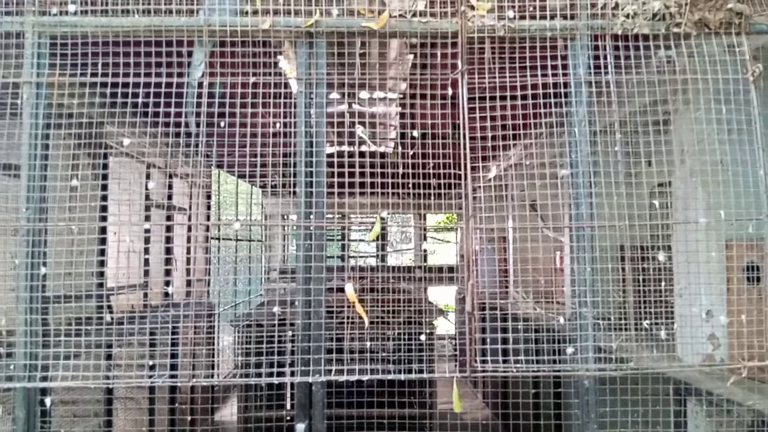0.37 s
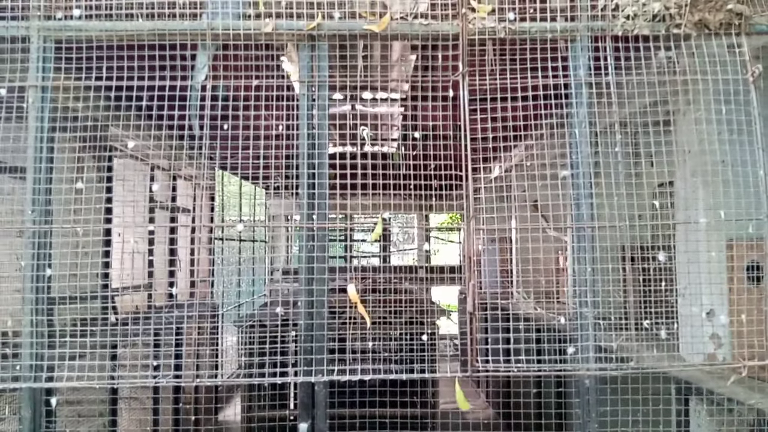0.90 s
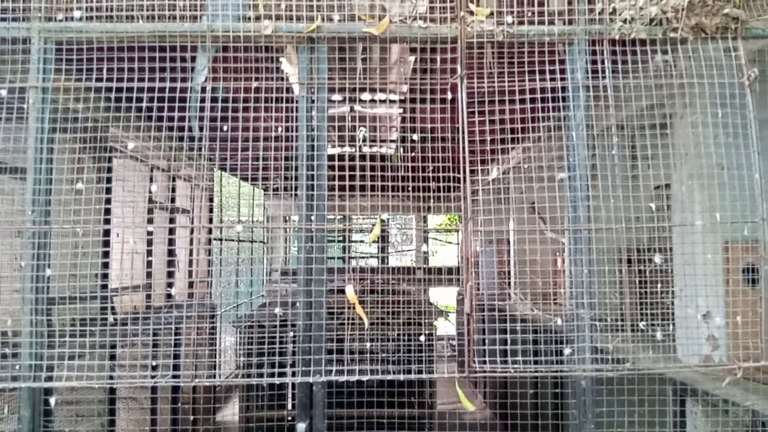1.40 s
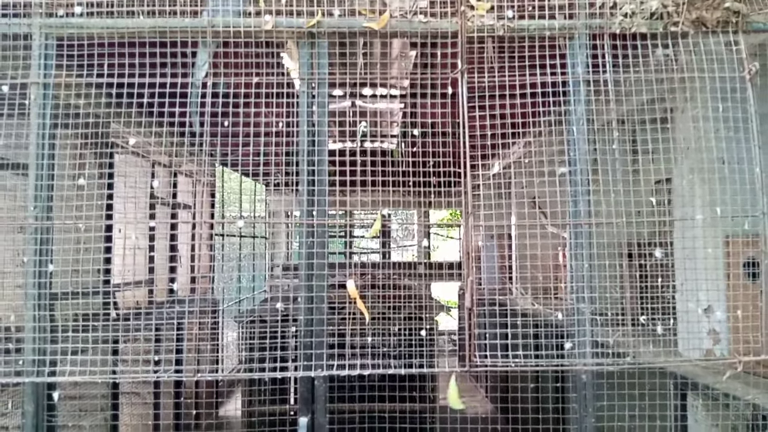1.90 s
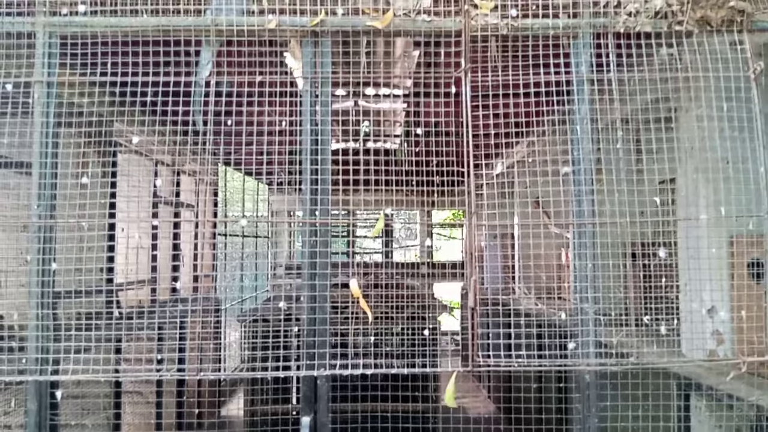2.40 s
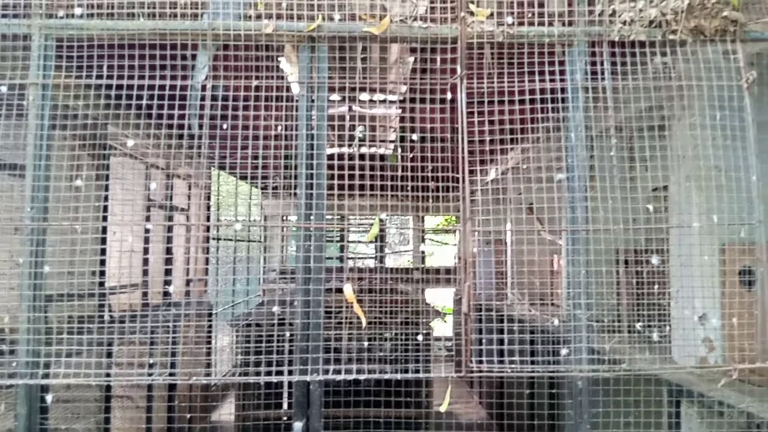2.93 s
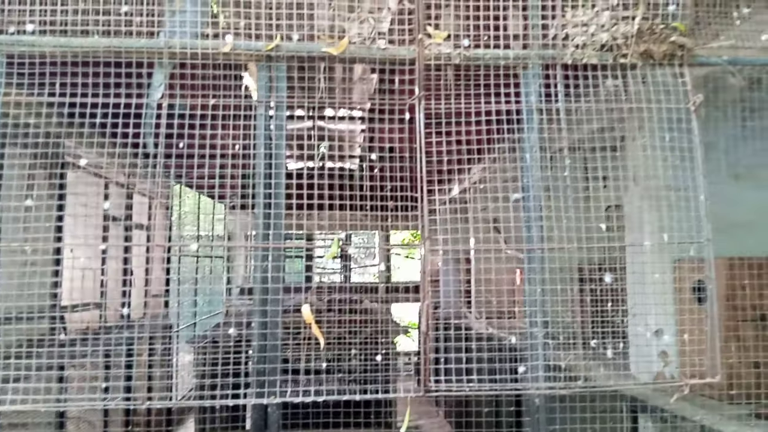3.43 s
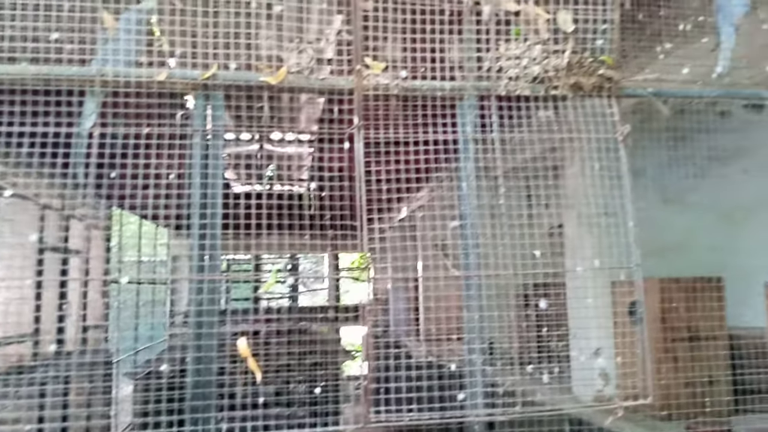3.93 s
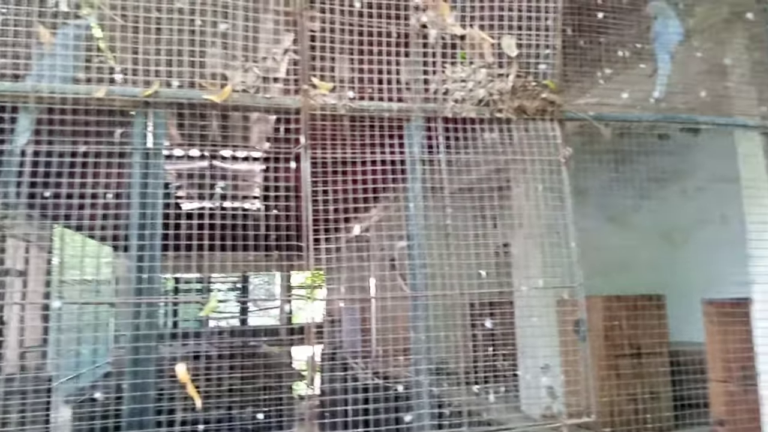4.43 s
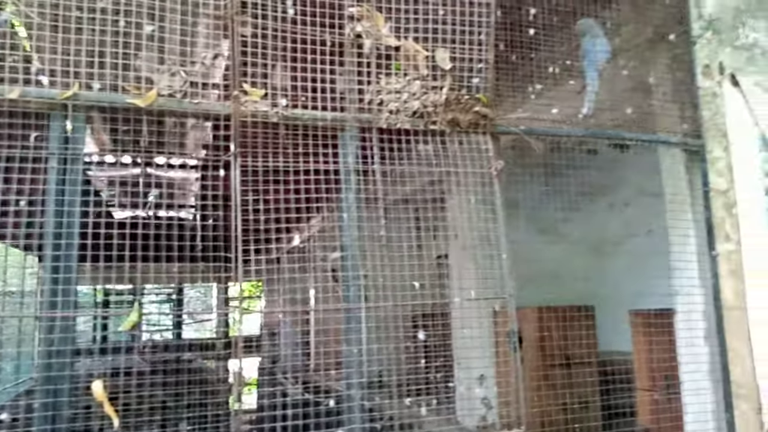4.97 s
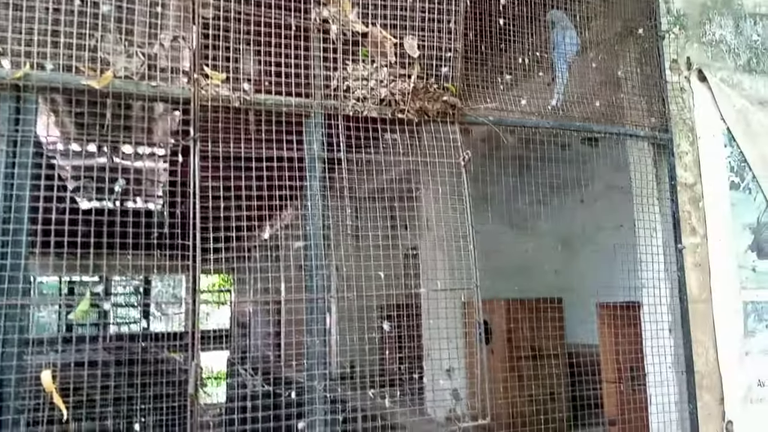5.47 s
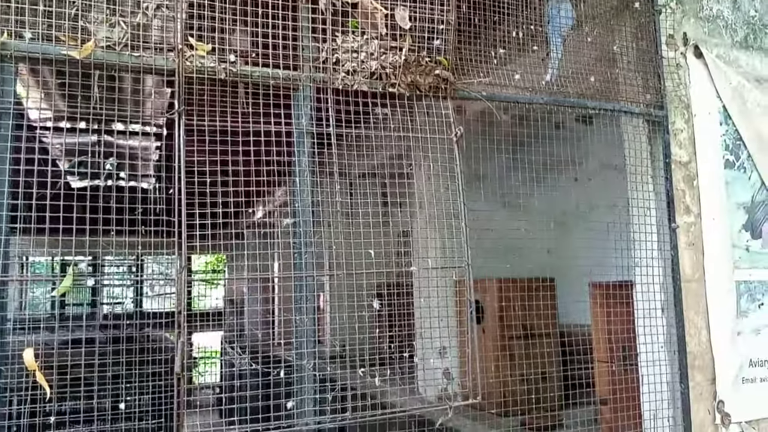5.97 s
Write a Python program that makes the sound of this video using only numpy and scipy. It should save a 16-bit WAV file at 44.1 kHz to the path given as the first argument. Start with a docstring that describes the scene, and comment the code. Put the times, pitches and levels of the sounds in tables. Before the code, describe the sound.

Shrill parakeet calls fill a small echoing aviary. First come four spaced warbles with a quick flutter and a lower fading tail, and one faint wooden knock. Then a nearer bird screeches in a fast regular series, joined by quick whistles and a winding call; a slight rustle passes near three seconds and the warbles resume. Quiet insect hiss and rumble duck beneath the loud calls.

```python
"""In a roofed wire aviary parakeets call: one repeats a warble, a nearer one answers with arched screeches,
others put in single whistles and long winding calls. Voices are harmonic series on a pitch curve, weighted by
throat, beak and microphone, with rasping breath. Walls and roof give a short echo, filtered noise makes the
hiss of insects outside, the rumble of air at the microphone and a rustle, and decaying partials make knocks
on wood. Gain control pulls the background down under loud calls."""
import sys
import numpy as np
from scipy import signal
from scipy.fft import rfft, irfft
from scipy.io import wavfile
from scipy.ndimage import uniform_filter1d

SR = 44100
rng = np.random.default_rng(int(sys.argv[2]) if len(sys.argv) > 2 else 0)


def natural_amplitude(level_db):
    """Convert a level in decibels to a linear amplitude factor, elementwise."""
    exponent = np.asarray(level_db, float) / 20
    return 10 ** exponent


def wav_out(sig):
    """Save sig, one row per channel (or a flat mono array), as 16-bit PCM at SR to the path in sys.argv[1]."""
    wavfile.write(sys.argv[1], SR, np.round(np.clip(np.atleast_2d(sig).T, -1, 1) * 32767).astype(np.int16))


N = 268921   # length [samples]

# warbles: (start [s], low note ends after [s], fade [s], high note [Hz], level [dB])
WARBLES = [(-0.005, 0.22, 0.17, 2126, 1), (0.526, .2, 0.19, 2131, 0.5), (1.069, .205, 0.18, 2111, 0),
           (1.637, 0.2, 0.15, 2097, -1.5), (3.038, 0.22, 0.29, 2106, -1.5), (3.586, 0.21, 0.21, 2116, -1),
           (4.151, .21, 0.16, 2088, -2.5), (4.727, 0.22, 0.19, 2067, -0.5), (5.3, 0.21, 0.22, 2039, -0.5)]
# screeches: (start [s], climb [s], crest [s], fall [s], top pitch [Hz])
ARCHES = [(1.696, .051, .046, .03, 2375), (1.885, .091, .04, .033, 2370), (2.155, .038, .044, .035, 2375),
          (2.378, .039, .045, .034, 2380), (2.604, .042, .042, .035, 2350), (2.835, .04, .041, .035, 2330),
          (3.058, .038, .041, .04, 2335), (3.276, .043, .049, .032, 2365), (3.512, .039, .043, .04, 2390),
          (3.732, .056, .042, .039, 2360), (3.977, .04, .044, .045, 2290), (4.212, .04, .039, .045, 2305),
          (4.435, .039, .034, .046, 2315), (4.66, .04, .042, .046, 2305), (4.892, .041, .045, .041, 2295),
          (5.128, .044, .044, .043, 2260), (5.377, .047, .042, .051, 2260)]
# short straight whistles: (start [s], length [s], from [Hz], to [Hz], level [dB], brightness [dB per octave])
WHISTLES = [(1.86, 0.09, 2780, 2160, -15, -5), (2.199, 0.071, 2800, 2320, -4.5, -5),
            (2.249, .07, 1923, 1736, -9, -16)]
# long winding calls of other birds, one list each: (time [s], pitch [Hz], level [dB])
LONG_CALLS = [
    [(1.9, 1500, -21), (1.93, 1604, -27), (1.95, 1885, -17), (1.978, 2125, -6.5), (2.013, 1679, -12),
     (2.045, 1705, -8), (2.09, 2060, -18.5), (2.115, 2150, -22.5), (2.14, 2130, -44)],
    [(5.462, 714, -22), (5.51, 1436, -6), (5.54, 1614, -9), (5.6, 1606, -11.5), (5.63, 1733, -9.5),
     (5.66, 1943, -10), (5.69, 2220, -18.5), (5.72, 2208, -34), (5.76, 2170, -56)],
]
# what throat, beak and microphone pass, for each kind of voice: (frequency [Hz], gain [dB])
WARBLER_COLOUR = [(700, -35), (1500, -21), (2100, -8), (2600, -14), (2950, 2), (3500, -5), (4200, -3),
                  (4600, -11.5), (5400, -21), (6600, -4), (7400, -13.5), (8500, -23), (10500, -36.5),
                  (12000, -40), (15000, -24.5)]
SCREECHER_COLOUR = [(600, -15.5), (1300, -25), (2350, -16), (2750, -10.5), (3200, -7.5), (3600, -1.5),
                    (4700, -3.5), (5300, -12), (6300, -13.5), (6800, -27), (7200, -34), (9400, -19.5),
                    (12000, -40), (14500, -36), (16000, -28)]
WHISTLER_COLOUR = [(700, -10.5), (1700, -12.5), (2500, -2.5), (3400, 12), (4300, 5), (4950, -1),
                   (6300, 2.5), (7500, -13), (9600, -3.5), (12000, -30), (15000, -17)]
# lift of the rasp over the voice's colour: (frequency [Hz], gain [dB])
BREATH_LIFT = [(700, -20.5), (1500, 9.5), (3000, -0.5), (7000, 11), (12000, 6), (15000, 17)]
# blows on wood: (time [s], level [dB])
KNOCKS = [(0.925, -34), (4.113, -48), (4.149, -48)]
# partials of a hollow wooden box: (frequency [Hz], level [dB], decay by 60 dB [s])
BOX_PARTIALS = [(234, -4.5, 0.33), (485, -25, 0.2), (610, -25, 0.15)]
# rumble, far hum and insect bands: (frequency [Hz], relative density [dB per Hz])
OUTSIDE = [(18, -72), (30, -11), (95, 2.5), (311, -11), (426, -15.5), (632, -6), (1590, -7.5), (2060, -4),
           (2610, 2), (2830, -9), (3140, 4), (4190, 4), (6050, 6), (6900, -9.5), (16000, -38)]
# colour of the rustle: (frequency [Hz], relative density [dB per Hz])
RUSTLE_COLOUR = [(250, -53), (600, -18), (1200, -9), (3000, -9), (6000, -36)]
# reverberation time of the aviary: (frequency [Hz], decay by 60 dB [s])
ECHO_T60 = [(500, 0.17), (2000, 0.39), (4000, 0.13), (7000, 0.093), (12000, 0.11)]
# treble lost on the straight path past perches and boxes: (frequency [Hz], gain [dB])
SHADOW = [(5000, 0), (7500, -2), (10000, -10), (15000, -13)]


def at_hz(points, hz):
    """Logarithmic frequency scale: a spectrum is interpolated along log frequency."""
    points = np.array(points)
    return np.interp(np.log(hz), np.log(points[:, 0]), points[:, 1])


def rms_one(x):
    """Normalisation to unit mean power."""
    return x / np.sqrt(np.mean(x ** 2) + 1e-20)


def drift(rate_hz, size):
    """Low-passed random process: two equal poles leave slow chance with spread 1."""
    r = np.exp(-2 * np.pi * rate_hz / SR)
    noise = rng.standard_normal(size + SR // 2)
    settled = signal.lfilter([1], [1, -2 * r, r * r], noise)[SR // 2:]
    return rms_one(settled)


def coloured(x, spectrum):
    """Linear filtering: each frequency is scaled by a spectrum in dB."""
    hz = np.fft.rfftfreq(len(x), 1 / SR) + 1   # keeps the logarithm finite
    return irfft(rfft(x) * natural_amplitude(at_hz(spectrum, hz)), len(x))


def add_call(out, s, hz, db, rasp_db, tilt_db, colour, waver, shimmer_db):
    """Source-filter principle: a harmonic series and breath noise are both weighted by the voice's colour."""
    n = np.arange(max(int(s[0] * SR), 0), int(s[-1] * SR))
    hz, db, rasp_db, tilt_db = [uniform_filter1d(np.interp(n / SR, s, curve), size=150, mode="nearest")
                                for curve in (hz, db, rasp_db, tilt_db)]
    pitch = hz * (1 + waver * drift(83, len(n)))
    phase = 2 * np.pi * np.cumsum(pitch) / SR
    tone = 0
    for k in range(1, 21):
        heard = k * pitch < 16500
        unsteady_db = shimmer_db * k * drift(53, len(n))   # upper partials flicker more
        partial_db = at_hz(colour, k * pitch) + tilt_db * np.log2(k) + unsteady_db
        tone = tone + heard * natural_amplitude(partial_db) * np.sin(k * phase)
    voice_noise = rms_one(coloured(rng.standard_normal(len(n)), colour))
    breath = coloured(voice_noise, BREATH_LIFT)
    return_to_rest = signal.windows.tukey(len(n), min(.008 * SR / len(n), 1))
    out[n] += natural_amplitude(db) * return_to_rest * (tone + natural_amplitude(rasp_db) * breath)


def outside():
    """Amplitude-modulated noise: insects and hum fluctuate quickly, the low rumble comes in slower lumps."""
    bed = rms_one(coloured(rng.standard_normal(N), OUTSIDE))
    low = signal.sosfilt(signal.butter(2, 300, fs=SR, output="sos"), bed)
    insects = (bed - low) * natural_amplitude(1.2 * drift(31, N))
    rumble = low * natural_amplitude(1.4 * drift(12, N))
    return natural_amplitude(-40.5) * (insects + rumble)


def warbler():
    """Frequency modulation of a voice: a swing up, two dips, a low note and a spring back; less effort is duller."""
    swing_from, low_note = .45, .7   # shares of the high note
    swing_s, slide_s, slide_end_s, spring_s = .01, .032, .158, .012
    dip_bottoms_s = (.0745, .105)   # after the start
    dip_fall_s, dip_dwell_s, dip_rise_s = .011, .004, .009
    onset_db, onset_s = -18, .009   # the voice catches
    swell_db, swell_s = -16, .11
    slack_db, low_note_db = -7, -1.5
    fade_db, fade_bend = -54.5, 1.57
    rasp_db, dip_rasp_db = -20, 3   # rasp against tone, and more of it in the dips
    out = np.zeros(N)
    for start, low_end, fade, high_hz, level_db in WARBLES:
        t = np.arange(0, low_end + fade, .001)
        dips, falling = 0, 0
        for s in dip_bottoms_s:
            corners = np.cumsum([s - dip_fall_s, dip_fall_s, dip_dwell_s, dip_rise_s])
            dips = dips + np.interp(t, corners, [0, 1, 1, 0])
            falling = falling + np.interp(t, [s - dip_fall_s, s - dip_fall_s / 3, s], [0, 1, 0])
        after = np.maximum(t - low_end, 0)
        slide = np.sin(np.pi / 2 * np.clip(1 + (t - slide_end_s) / slide_s, 0, 1)) ** 2
        low = uniform_filter1d(slide * np.exp(-after / spring_s), size=7)   # rounded corners
        swing = (1 - swing_from) * np.exp(-t / swing_s)
        hz = high_hz * (1 - swing - (1 - low_note) * (dips + low))
        effort_db = onset_db * np.exp(-t / onset_s) + swell_db * np.exp(-t / swell_s)
        effort_db = effort_db + slack_db * falling + low_note_db * low
        effort_db = effort_db + fade_db * (after / fade) ** fade_bend
        add_call(out, start + t, hz, effort_db + level_db, rasp_db + dip_rasp_db * dips, .25 * effort_db,
                 WARBLER_COLOUR, waver=.005, shimmer_db=1.2)
    return out


def aviary(x, gap_s, early_db, early_t60):
    """Reverberation by convolution: quick near reflections, then noise that decays band by band."""
    t = np.arange(SR // 2) / SR
    edges = 300 * 2 ** np.arange(0, 6, .5)   # half octaves [Hz]
    response = 0
    for low, high in zip(edges, edges[1:]):
        band_pass = signal.butter(2, [low, high], "band", fs=SR, output="sos")
        band = signal.sosfilt(band_pass, rng.standard_normal(len(t)))
        late = natural_amplitude(-60 * t / at_hz(ECHO_T60, np.sqrt(low * high)))
        early = natural_amplitude(early_db - 60 * t / early_t60)
        response = response + band * (late + early)
    response = response * np.clip(t / gap_s, 0, 1)   # builds up over the first gap
    return signal.fftconvolve(x, response / np.sqrt(np.sum(response ** 2)))[:N]


def knock():
    """Free vibration of a struck body: the partials of a wooden box decay exponentially."""
    out = np.zeros(N)
    for s, level_db in KNOCKS:
        t = np.maximum(np.arange(N) / SR - s, 0)
        for hz, db, t60 in BOX_PARTIALS:
            out += natural_amplitude(level_db + db - 60 * t / t60) * np.sin(2 * np.pi * hz * t)
    return out


def screecher():
    """Register break in a voice: the nearer bird starts weak and raspy, jumps in pitch and clears as it climbs."""
    # pitches as shares of the top; the fall grows ever faster
    climb_from, shoulder, fall_to, rounding, fall_bend = .32, .94, .75, 3.6, 1.45
    break_from, break_to = .55, .735
    break_before_s, break_s = .0175, .002   # time before the shoulder, length
    weak_db, half_open_db, opening_s = -25.5, -15, .0066   # the voice opens after the break
    shut_db, shut_bend = -8.5, 2.5   # and shuts at the end of the fall
    clear_db, rasp_per_db = -21, .35   # rasp against tone at full effort; weak voice rasps more
    out = np.zeros(N)
    for start, climb, crest, fall, top_hz in ARCHES:
        t = np.arange(0, climb + crest + fall, .001)
        snap = climb - break_before_s
        over = np.clip((t - climb) / crest, 0, 1)
        down = np.clip((t - climb - crest) / fall, 0, 1)
        up = np.interp(t, [0, snap, snap + break_s, climb], [climb_from, break_from, break_to, shoulder])
        rounded_top = (1 - shoulder) * (1 - (1 - over) ** rounding)
        hz = top_hz * (up + rounded_top - (1 - fall_to) * down ** fall_bend)
        effort_db = np.interp(t, [0, snap, snap + opening_s], [weak_db, half_open_db, 0])
        effort_db = effort_db + shut_db * down ** shut_bend
        add_call(out, start + t, hz, effort_db, clear_db - rasp_per_db * effort_db, .093 * effort_db,
                 SCREECHER_COLOUR, waver=.003, shimmer_db=.37)
    return out


def whistlers():
    """Glides of a harmonic voice: other birds give straight short whistles and long winding calls."""
    attack_s, release_s, edge_db = .013, .0061, -25
    long_call_tilt_db = -.5   # per octave
    out, calls = np.zeros(N), []
    for s, hz, db in map(np.transpose, LONG_CALLS):
        t = np.arange(s[0], s[-1], .001)
        bends = uniform_filter1d(np.interp(t, s, hz), size=17, mode="nearest")   # pitch turns smoothly
        calls.append((t, bends, np.interp(t, s, db), long_call_tilt_db))
    for start, length, from_hz, to_hz, db, tilt_db in WHISTLES:
        t = np.array([0, attack_s, length - release_s, length])
        glide = from_hz + (to_hz - from_hz) * t / length
        calls.append((start + t, glide, db + edge_db * np.array([1, 0, 0, 1]), tilt_db))
    for s, hz, db, tilt_db in calls:
        add_call(out, s, hz, db, np.full(len(s), -19.0), np.full(len(s), tilt_db), WHISTLER_COLOUR,
                 waver=.007, shimmer_db=0)
    return out


def rustle():
    """Random superposition of uneven grains: modulated noise, as of wings or dry litter."""
    grains = rng.standard_normal(N) * natural_amplitude(1.4 * drift(39, N))
    corners = np.cumsum([2.84, .08, .08, .22])   # start, rise, hold and fade [s]
    envelope = np.interp(np.arange(N) / SR, corners, [0, 1, 1, 0])
    return rms_one(coloured(grains, RUSTLE_COLOUR)) * natural_amplitude(-34) * envelope


def scene():
    """Superposition of direct and reflected sound: each voice has its own echo, the far ones are half hidden."""
    background = outside()
    far, near, others = warbler(), screecher(), whistlers()
    echo = natural_amplitude(-5) * aviary(far, gap_s=.005, early_db=5, early_t60=.14)
    echo = echo + natural_amplitude(-9) * aviary(near, gap_s=.003, early_db=14.5, early_t60=.19)
    echo = echo + natural_amplitude(-5) * aviary(others, gap_s=.005, early_db=6, early_t60=.12)
    direct = coloured(far + others, SHADOW) + near
    return (direct + echo + knock() + rustle() + background)[None]


def gain_control(x, threshold_db, share, release_db_s, attack_s):
    """Dynamic compression: a share of the level over the threshold is taken back, with steady release."""
    level_db = 10 * np.log10(uniform_filter1d(x ** 2, size=200) + 1e-12)
    ramp = release_db_s * np.arange(N) / SR
    held_db = np.maximum.accumulate(level_db + ramp) - ramp   # peaks sink at the release rate
    r = np.exp(-1 / (attack_s * SR))
    excess_db = np.maximum(held_db - threshold_db, 0)
    cut_db = signal.lfilter([1 - r], [1, -r], share * excess_db)
    return x * natural_amplitude(-cut_db)


def top_cut(x):
    """Nothing passes above the cut-off."""
    return signal.sosfilt(signal.butter(12, 16920, fs=SR, output="sos"), x)


def record(dry):
    """Compression and band limiting: gain control acts first, then a steep low-pass cuts the top."""
    held = gain_control(dry[0], threshold_db=-19.6, share=.85, release_db_s=200, attack_s=.002)
    low_pass = signal.cheby2(10, 50, 16300, fs=SR, output="sos")   # 50 dB down from 16300 Hz
    mix = signal.sosfilt(low_pass, held)[None]
    return top_cut(mix)


dry = scene()
out = record(dry)
wav_out(out)
```